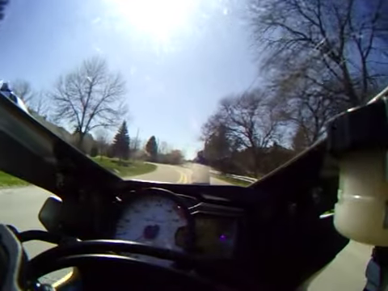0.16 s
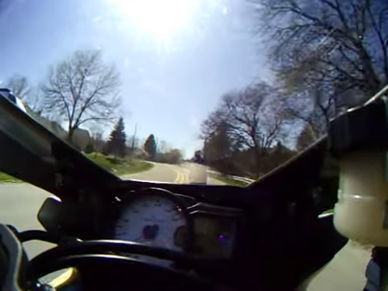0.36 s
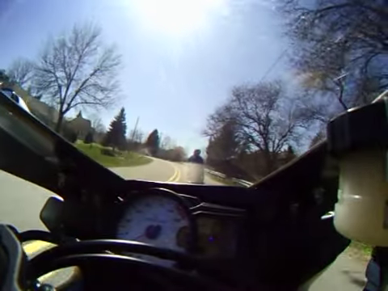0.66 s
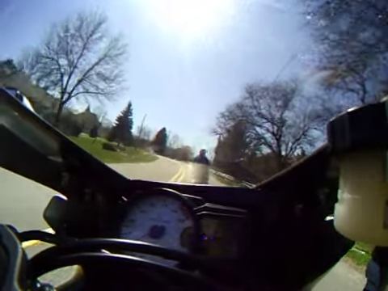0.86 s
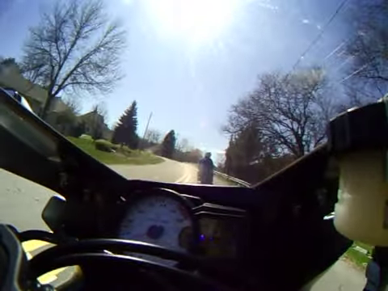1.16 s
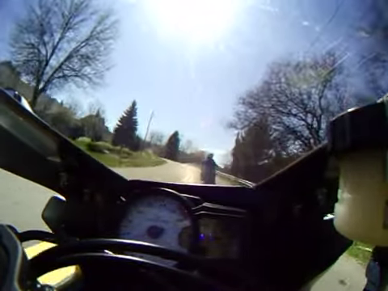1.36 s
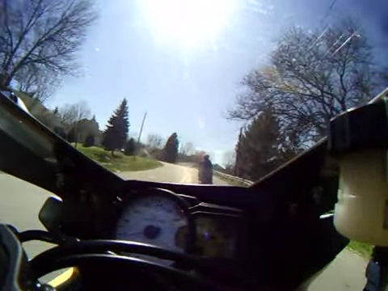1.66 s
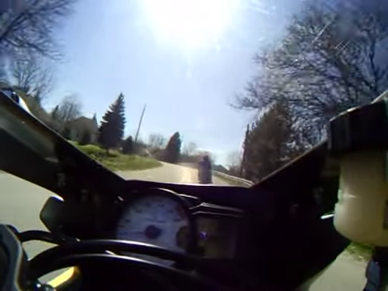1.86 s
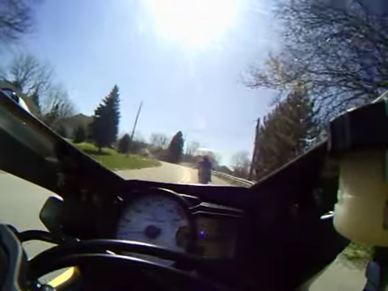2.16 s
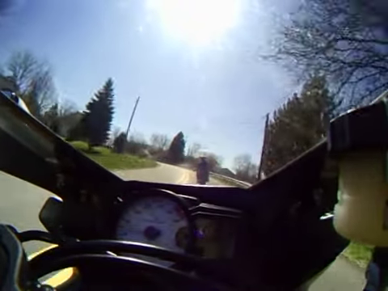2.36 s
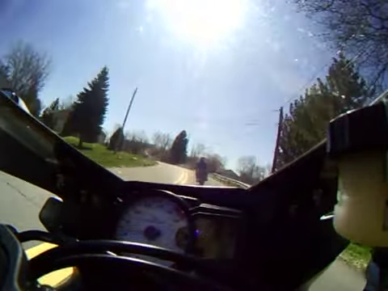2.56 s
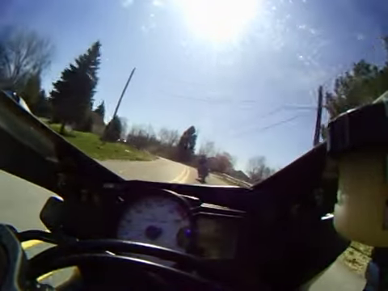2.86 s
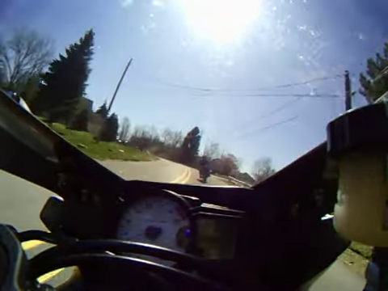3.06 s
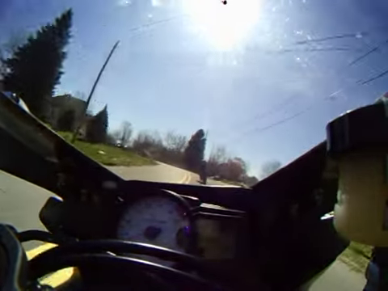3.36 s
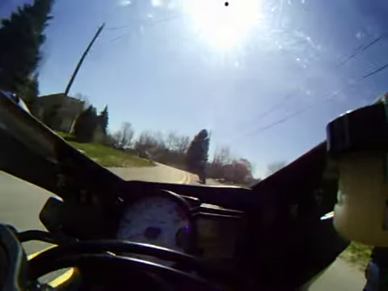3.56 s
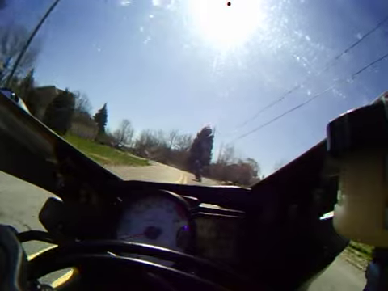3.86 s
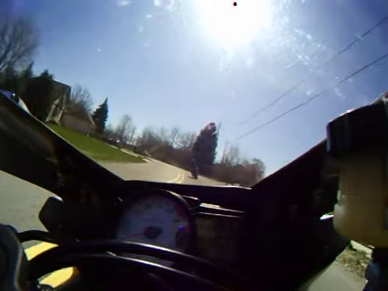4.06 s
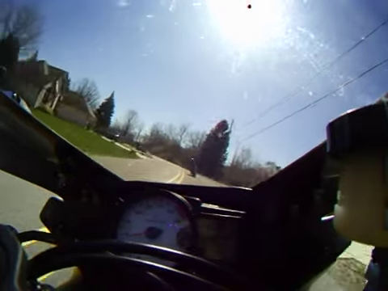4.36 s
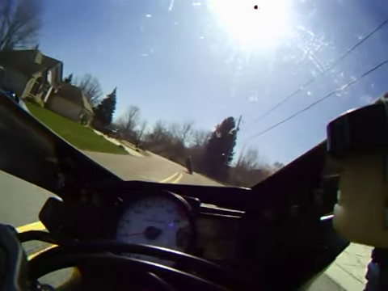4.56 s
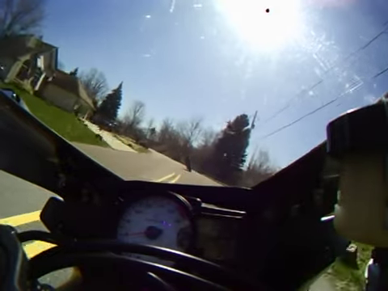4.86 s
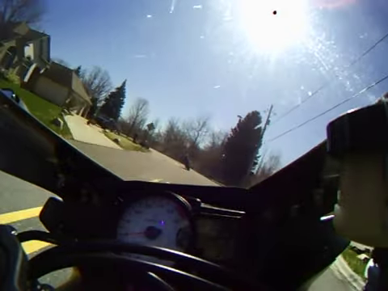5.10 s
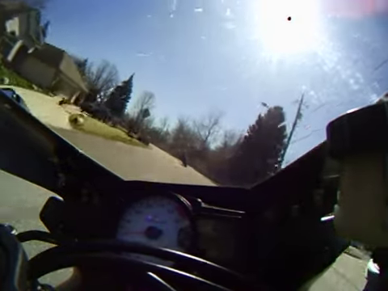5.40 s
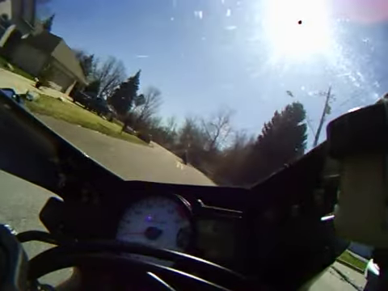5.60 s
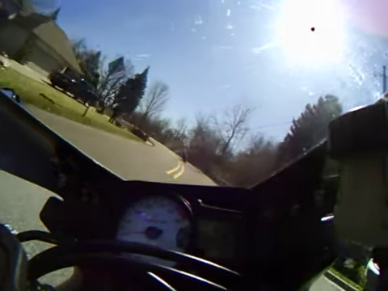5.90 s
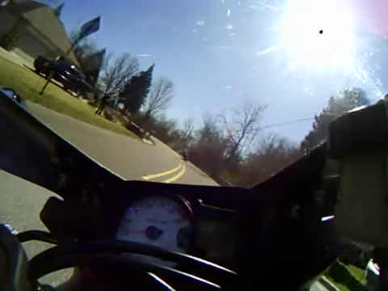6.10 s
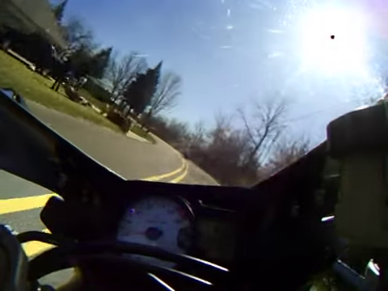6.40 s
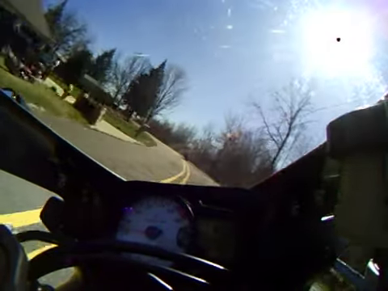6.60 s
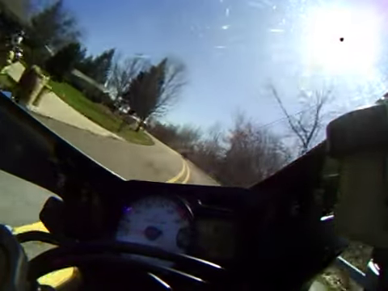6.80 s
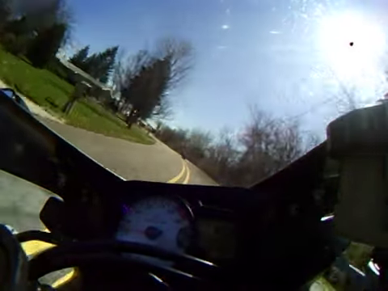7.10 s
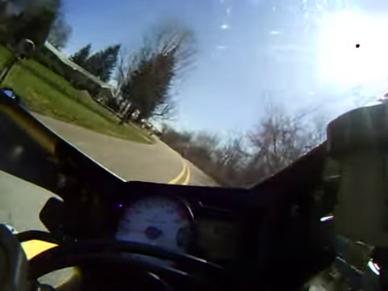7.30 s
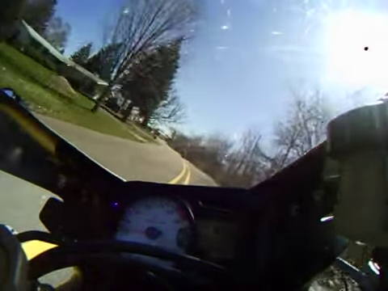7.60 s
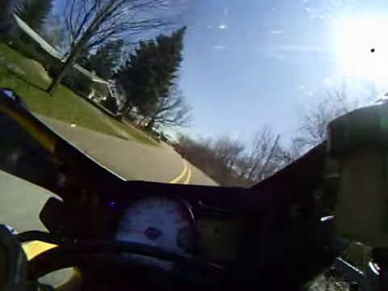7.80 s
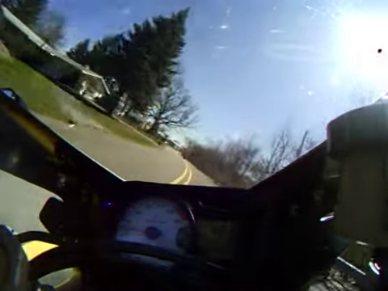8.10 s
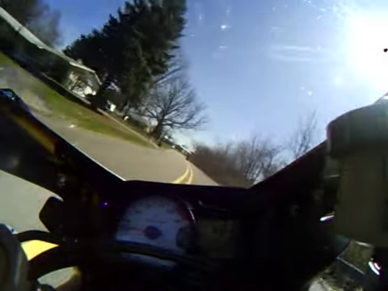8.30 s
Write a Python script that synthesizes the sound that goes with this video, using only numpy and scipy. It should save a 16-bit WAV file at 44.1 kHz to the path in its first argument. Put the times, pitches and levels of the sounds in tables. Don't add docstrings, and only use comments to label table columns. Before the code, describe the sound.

A sport motorcycle accelerates along an open road, its engine close and nasal. The first pull rises quickly, a shift briefly softens and drops the note, and the second pull climbs more slowly. From six seconds coarse vibration bursts dominate, with buffeting wind and tyre hiss beneath. The onboard microphone sounds dull on top, overloaded and crackly.

```python
import sys
import numpy as np
from scipy import signal
from scipy.fft import rfft, irfft, next_fast_len
from scipy.io import wavfile
from scipy.ndimage import uniform_filter1d

SR = 44100
rng = np.random.default_rng(int(sys.argv[2]) if len(sys.argv) > 2 else 0)


def ratio_of_db(decibels):
    return 10 ** (np.asarray(decibels, float) / 20)


def wav_out(sig):
    wavfile.write(sys.argv[1], SR, np.round(np.clip(np.atleast_2d(sig).T, -1, 1) * 32767).astype(np.int16))


N = 372644
TIME = np.arange(N) / SR
SHIFT_S = 3.03
STEP = 64


def level(x, db):
    return x * ratio_of_db(db) / np.sqrt(np.mean(x ** 2))


def curves(table):
    s, *columns = np.transpose(table)
    return [np.interp(TIME, s, column) for column in columns]


def colour(x, points):
    hz, db = np.transpose(points)
    size = next_fast_len(N)
    bins_hz = np.arange(size // 2 + 1) * SR / size
    gain = ratio_of_db(np.interp(np.log(bins_hz + 1), np.log(hz), db))
    return irfft(rfft(x, size) * gain, size)[:N]


def ring(x, modes):
    total = 0
    for k, (hz, width, db) in enumerate(modes):
        b, a = signal.iirpeak(hz, hz / width, SR)
        total = total + (-1) ** k * ratio_of_db(db) * signal.lfilter(b, a, x)
    return total


def drift(rate):
    k = int(SR / rate / STEP)
    held = np.repeat(rng.standard_normal(N // STEP // k + 2), k)
    return 1.11 * uniform_filter1d(uniform_filter1d(held, k), k)


def spread(steps):
    return np.interp(np.arange(N) / STEP, np.arange(len(steps)), steps)


def walk(rate):
    return spread(drift(rate))


def tone(turns, multiple, flutter_db):
    strength = spread(ratio_of_db(flutter_db * drift(14)))
    return np.sqrt(2) * strength * np.sin(2 * np.pi * (multiple * turns + rng.random()))


def orders(turns, table, flutter_db):
    return sum(ratio_of_db(db) * tone(turns, multiple, flutter_db) for multiple, db in table)


def gate(turns, cycle, firing):
    return np.exp(cycle * np.cos(np.pi * turns / 2) + firing * np.cos(2 * np.pi * turns))


def firings(turns, jitter, scatter_db, uneven=1):
    # (strength [dB], timing error [firings])
    cylinders = [(-1.5, 0.0122), (-5, 0.06), (-2, -0.013), (0.5, 0.0309)]
    count = np.arange(1, int(turns[-1]) - 1)
    cylinder = uneven * np.array(cylinders)[count % 4]
    chance = rng.standard_normal((len(count), 2))
    place = np.interp(count + cylinder[:, 1] + jitter * chance[:, 0], turns, np.arange(N))
    pulses = np.zeros(N)
    pulses[place.astype(int)] = ratio_of_db(cylinder[:, 0] + scatter_db * chance[:, 1])
    return pulses


def through_fairing(x):
    # (frequency [Hz], width [Hz], level [dB])
    panels = [(639, 64, 2), (1018, 150, 0.5), (1270, 18, -10), (1499.6, 79, -6.5), (2463.3, 81, -4),
              (550, 100, -5), (2741.4, 100, -2.5)]
    return ring(ring(x, panels), panels)


def combustion(turns):
    # (multiple of firing rate [1], level [dB])
    airbox = [(2.75, -10), (3, -3), (3.75, -4.5), (4, 2.5), (4.25, -9.5), (5, 1.5), (6, -5), (6.75, -12.5),
              (8, 2), (8.5, -4), (10, -1.5), (14.25, -3.5), (16, -7), (19.5, -3)]
    # (multiple of firing rate [1], level [dB])
    exhaust = [(2, -21), (1.75, -32.5), (.5, -18.5), (2.5, -28), (2.25, -32)]
    pulses = firings(turns, jitter=.005, scatter_db=.6)
    intake = orders(turns, airbox, flutter_db=2.0)
    body = level(through_fairing(pulses), -6.5) + level(through_fairing(intake), -4.5)
    return body + orders(turns, exhaust, flutter_db=2.5)


def gear_whine(turns):
    # (multiple of firing rate [1], level [dB])
    teeth = [(3.54, -0.5), (7.08, 4), (10.62, 4.5), (5.75, -9)]
    mesh = orders(turns, teeth, flutter_db=-2.5)
    return level(through_fairing(mesh), 0) + level(mesh, -5.5)


def engine(turns, db, whine_db):
    # (multiple of firing rate [1], level [dB])
    drone = [(.6, -37), (.75, -35.5), (.38, -42)]
    fade = 1 / (1 + np.exp((TIME - 0.81) / 0.3))
    gears = ratio_of_db(whine_db) * (0.046 + fade) * gear_whine(turns)
    return ratio_of_db(db) * combustion(turns) + gears + fade * orders(turns, drone, flutter_db=2.0)


def rush(turns, db):
    # (frequency [Hz], density [dB per Hz])
    spectrum = [(35, -36.5), (60, -6), (118, -16.5), (166, -6.5), (213, -16), (334, -15.5), (392, -22),
                (624, -6), (746, -17.5), (1030, -6), (1420, -19), (2430, -10), (3470, -20.5), (4300, -58),
                (5590, -81.5), (9460, -120)]
    # (frequency [Hz], width [Hz], level [dB])
    tyres = [(1600, 360, 7.5), (2090, 77, -0.5)]
    # (frequency [Hz], width [Hz], level [dB])
    screen = [(2362, 200, -2), (2750, 58, 0.5)]
    noise = rng.standard_normal(N) * gate(turns, cycle=0.19, firing=0.15) * ratio_of_db(2.2 * walk(29))
    speed = 1 - np.exp(-TIME / 10)
    air = level(colour(noise, spectrum), 0.17)
    hiss = speed * level(ring(noise, tyres), 0.5)
    return ratio_of_db(db) * (air + hiss + level(ring(noise, screen), -15.5))


def wind(db):
    noise = rng.standard_normal(N) * ratio_of_db(2.2 * walk(35))
    rumble = colour(noise, [(12, -6.5), (28, 7.5), (60, -2.0), (130, -9), (400, -25.5)])
    buffeting = ratio_of_db(uniform_filter1d(db, size=SR // 6) - 9.0)
    return level(rumble, 0) * (buffeting + ratio_of_db(-50.5))


def shaking(steady_db):
    # (start [s], length [s], shaking [dB], once-a-cycle thump [dB])
    bursts = [(2.274, 0.123, -24.5, -37), (2.422, 0.055, -20.5, -42), (2.483, 0.0668, -16.5, -38),
              (2.586, 0.083, -17.5, -27.5), (2.754, 0.071, -18.5, -35), (4.516, 0.15, -29, -40),
              (4.906, 0.142, -26, -28.5), (5.066, 0.055, -31.5, -28), (5.225, 0.2844, -24.5, -30.5),
              (5.656, .21, -21, -36), (6.05, 0.19, -18, -24.5), (6.386, 0.2, -16, -21),
              (6.642, 0.09, -20.5, -22), (6.766, .24, -16, -21), (7.089, 0.059, -17.5, -36),
              (7.181, 0.17, -14.5, -23.5), (7.374, 0.024, -24, -23.5), (7.452, 0.012, -17, -27),
              (7.522, 0.14, -17.5, -23.5), (7.718, .08, -29.5, -28.5), (7.871, 0.02, -21.5, -32),
              (7.947, 0.068, -14.5, -41)]
    power = ratio_of_db(2 * (steady_db + .7 * walk(12)))
    thump = ratio_of_db(2 * (steady_db - 6))
    for start, length, db, thump_db in bursts:
        swell, die = 0.0031 + 0.14 * length, 0.0031 + 0.072 * length
        near = slice(int((start - 6 * swell) * SR), int((start + length + 6 * die) * SR))
        rise = 1 + np.tanh((TIME[near] - start) / swell)
        shape = rise * (1 - np.tanh((TIME[near] - start - length) / die)) / 4
        power[near] += ratio_of_db(2 * db) * shape
        thump[near] += ratio_of_db(2 * thump_db) * shape
    return 10 * np.log10(power), 10 * np.log10(thump)


def follow(db, pivot_level_db, slope):
    return pivot_level_db + slope * (db + 25)


def mount_overtones(turns):
    # (multiple of firing rate
    # [1], level [dB])
    mount_orders = [(0.25, -6), (0.5, -26.5), (0.75, -16), (1, 0), (1.25, -19), (1.5, -35), (1.75, -13.5),
                    (2, -15.5), (2.25, -12.5), (2.5, -20.5), (2.75, -8.5), (3, 0.5), (3.25, -24),
                    (3.5, -37.5), (3.75, -24.5), (4, -13), (4.25, -18.5), (4.5, -23.5), (4.75, -11),
                    (5, -5.5), (5.25, -25), (5.5, -32), (5.75, -19), (6, -8), (6.25, -24), (6.5, -20),
                    (6.75, -29), (7, -13),
                    (8, -7.5), (9, -7), (10, -8.5)]
    # (frequency [Hz], width [Hz], level [dB])
    mount_modes = [(614, 120, -1.5), (1043, 92, 1)]
    carried = [row for row in mount_orders if row[0] not in (.25, 1, 3, 5, 6)]
    over = orders(turns, carried, flutter_db=1.5)
    return level(ratio_of_db(-6.5) * over + ring(over, mount_modes), -1.8)


def smear(x, late_s):
    size = next_fast_len(N)
    hz = np.arange(size // 2 + 1) * SR / size
    return irfft(rfft(x, size) * np.exp(-1j * np.pi * late_s * hz ** 2 / 4000), size)[:N]


def case_knocks(turns):
    uneven = level(firings(turns, jitter=.007, scatter_db=2.0), -4)
    even = level(firings(turns, jitter=.004, scatter_db=1.5, uneven=.15), 1)
    knocks = np.where(np.arange(N) < SHIFT_S * SR, even, uneven)
    return smear(knocks, late_s=0.00401)


def crackle():
    # (frequency [Hz], width [Hz], level [dB])
    crackle_band = [(3870, 1400, 0)]
    snaps = (rng.random(N) < 9 / SR) * rng.exponential(size=N)
    decay = np.exp(-1 / (0.0017 * SR))
    burst = signal.lfilter([1], [1, -decay], snaps) * rng.standard_normal(N)
    return level(ring(ring(burst, crackle_band), crackle_band), -28)


def case_buzz(turns):
    # (frequency [Hz], density [dB per Hz])
    spectrum = [(140, -35), (230, -4), (290, -12.5), (457, -6.5), (516, -12.5), (613, -5), (710, -28.5),
                (803, -2.5), (1000, -13.5), (1310, -10.5), (1820, 2.5), (2170, -3), (2480, -3),
                (3490, -11.5), (4300, -41), (5590, -61.5), (9460, -120)]
    # (frequency [Hz], width [Hz], level [dB])
    case = [(2450, 130, 0), (1870, 200, -10), (2850, 300, -9)]
    # (frequency [Hz], width [Hz], level [dB])
    bracket = [(1120, 520, 0)]
    knocks = case_knocks(turns)
    noise = rng.standard_normal(N) * gate(turns, cycle=.35, firing=0.061) * ratio_of_db(2.5 * walk(43))
    chatter = knocks + noise
    buzz = level(colour(chatter, spectrum), -2) + level(ring(chatter, case), -5.0) + crackle()
    return buzz + level(ring(ring(knocks, bracket), bracket), -8.5)


def mount(turns, hz, firing_db, thump_db, overtone_db, buzz_db):
    ringing = 1 / (1 + np.exp((177 - hz) / 5.0))
    hard = 1 / (1 + np.exp(-(buzz_db + 30) / 12.2))
    firing = ratio_of_db(firing_db - 0.26) * tone(turns, 1, flutter_db=0.4)
    thump = ratio_of_db(thump_db + 1.5) * tone(turns, .25, flutter_db=3.0)
    third = tone(turns, 3, flutter_db=1.5) * ratio_of_db(-2.0 - 0.95 * np.maximum(hz - 198.4, 0))
    overtones = (third + mount_overtones(turns)) * ratio_of_db(overtone_db)
    return firing + ringing * (overtones + hard * thump) + hard * case_buzz(turns) * ratio_of_db(buzz_db)


def scene():
    # (time [s], firing rate [Hz])
    crank = [(0.0, 114.8), (0.2, 124.0), (0.6, 139.4), (1.2, 163.0), (1.6, 175.6), (2.0, 188.0),
             (2.68, 212.2), (2.745, 210.5), (2.95, 163.0), (3.05, 154.3), (3.15, 153.6), (3.3, 160.4),
             (3.85, 169.2), (5.25, 187.3), (6.65, 203.0), (7.35, 207.5), (7.7, 211.6), (8.45, 226.5)]
    # (time [s], steady shaking of the mount [dB], airborne engine [dB])
    effort = [(0.0, -41.5, -33.5), (.5, -36, -32.5), (.9, -32, -29), (1.4, -30, -25.5), (1.8, -34.5, -27.5),
              (2.2, -29.5, -35.5), (2.7, -27.5, -29), (2.96, -32.5, -27), (3.7, -31, -28.5),
              (4.4, -30.5, -35), (5.2, -31, -49), (5.95, -25, -27.5), (6.3, -26, -34.5), (7.1, -25, -28),
              (7.5, -24, -34.5), (8.45, -24, -23)]
    clutch = np.exp(-((TIME - SHIFT_S) / 0.12) ** 4)
    late = TIME - 3.12
    hz = curves(crank)[0] + 8 * np.cos(2 * np.pi * 7.2 * late) * np.exp(-(late / .2) ** 2)
    turns = np.cumsum(hz) / SR + (0.011 + 0.025 * clutch) * walk(25)
    stumble_db = 5.0 * clutch * (walk(30) - .8)
    steady_db, engine_db = curves(effort)
    shake_db, thump_db = shaking(steady_db)
    airborne = engine(turns, engine_db + stumble_db, whine_db=engine_db - 5.5)
    rush_db = follow(uniform_filter1d(shake_db, int(0.25 * SR)), -28.5, 0.47)
    overtone_db, buzz_db = follow(shake_db, -26.5, 0.8), follow(shake_db, -24.5, 1.314)
    held = mount(turns, hz, shake_db - 12 * clutch, thump_db, overtone_db, buzz_db)
    return (airborne + rush(turns, rush_db) + held + wind(thump_db))[None]


def roll_off(x):
    return signal.sosfilt(signal.butter(12, 15800, fs=SR, output="sos"), x)


def record(dry):
    # (frequency [Hz], width [Hz], level taken out [dB])
    housing = [(2178, 110, -5)]
    # (time [s], click level [dB])
    overloads = [(2.6026, -42), (6.0975, -41), (6.4583, -31), (6.498, -33), (6.545, -35), (6.5526, -31),
                 (6.8142, -29), (6.8247, -32), (6.8339, -46), (6.9079, -47), (6.9327, -36), (6.9913, -42),
                 (7.1991, -40), (7.206, -46), (7.2103, -46), (7.2154, -34), (7.2207, -30), (7.2257, -36),
                 (7.2307, -41), (7.249, -39), (7.2683, -34), (7.5751, -37), (7.6368, -41), (7.9856, -33),
                 (7.9906, -45), (8.004, -32)]
    clip = .72
    flat = clip * np.tanh(1.2 * (dry - ring(dry, housing)) / clip)
    low_pass = signal.cheby2(12, 70, 5020, fs=SR, output="sos")
    narrow = signal.sosfilt(low_pass, flat)
    overshoot = narrow - np.clip(narrow, -.95 * clip, .95 * clip)
    narrow = narrow - signal.sosfiltfilt(low_pass, 2 * overshoot)
    s, db = np.transpose(overloads)
    shaved = np.zeros(N)
    shaved[(s * SR).astype(int)] = ratio_of_db(db + 7.0)
    shaved = np.convolve(shaved, [.3, 0.65, 0.98, 0.46], "same")
    mix = narrow - np.sign(narrow) * shaved
    return roll_off(mix)


dry = scene()
out = record(dry)
wav_out(out)
```